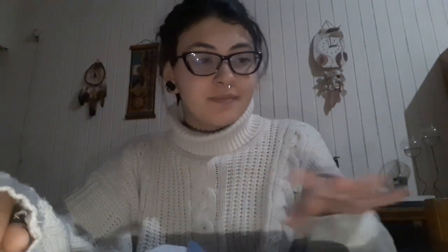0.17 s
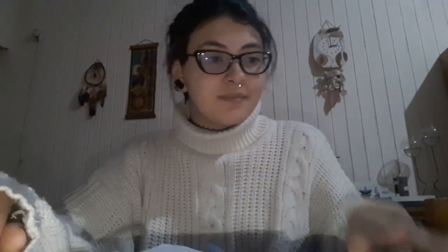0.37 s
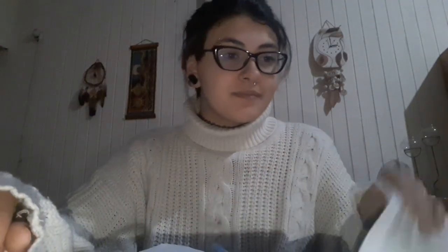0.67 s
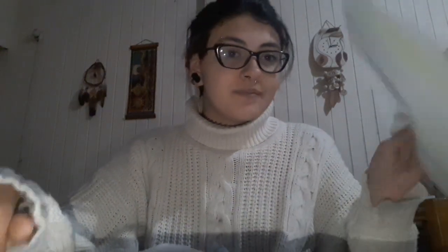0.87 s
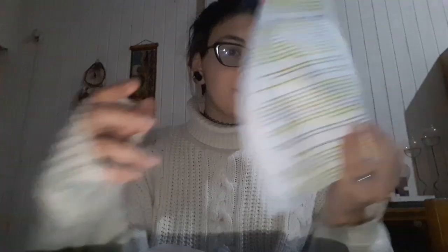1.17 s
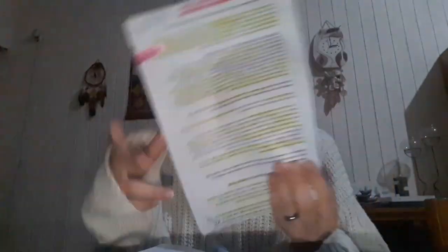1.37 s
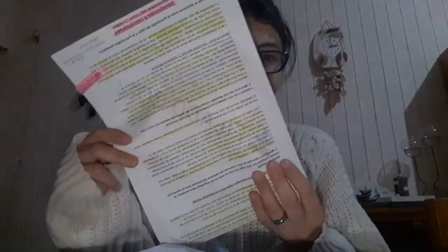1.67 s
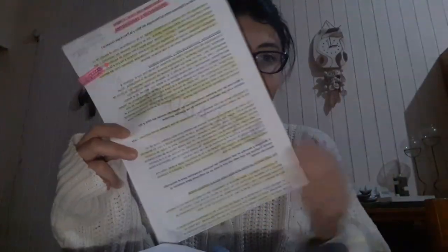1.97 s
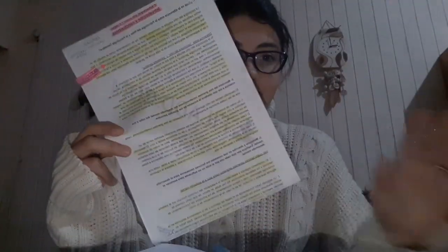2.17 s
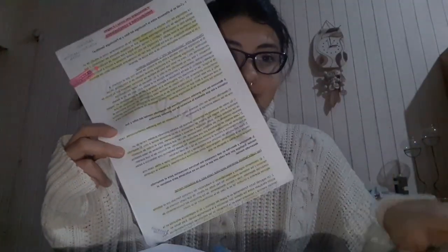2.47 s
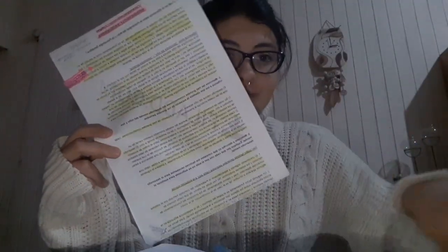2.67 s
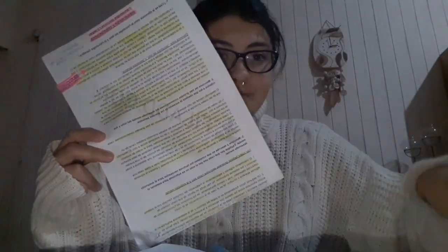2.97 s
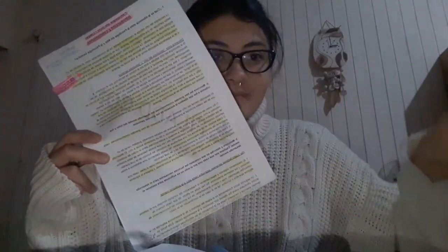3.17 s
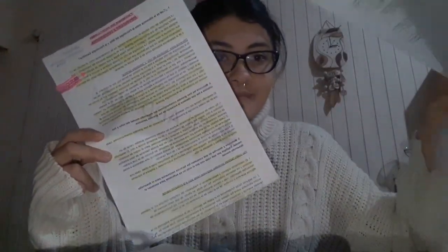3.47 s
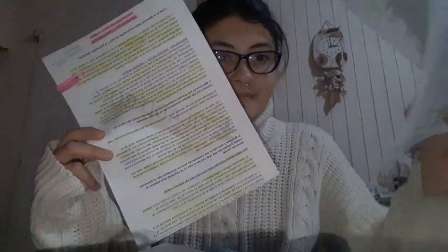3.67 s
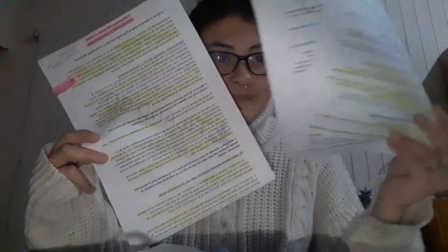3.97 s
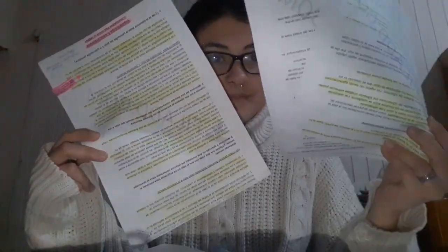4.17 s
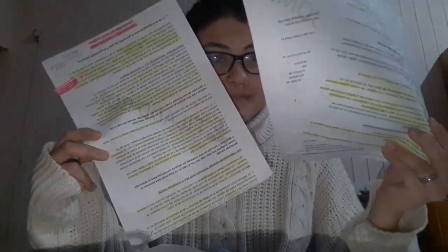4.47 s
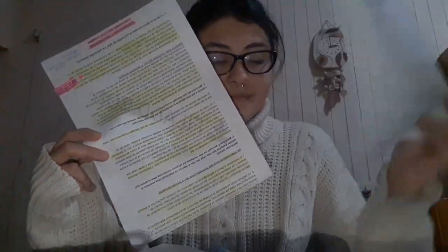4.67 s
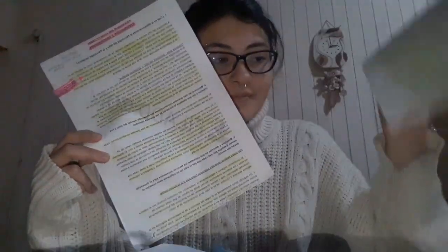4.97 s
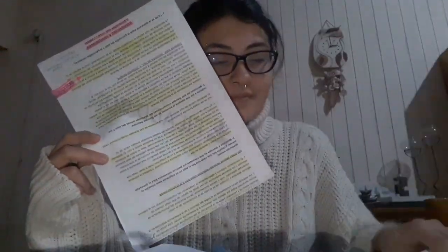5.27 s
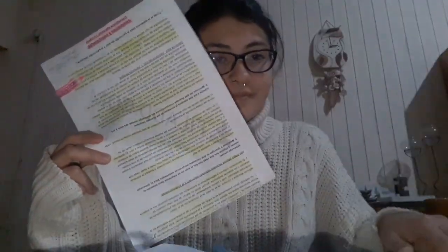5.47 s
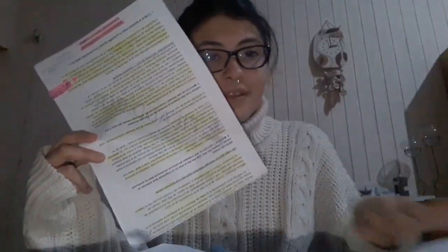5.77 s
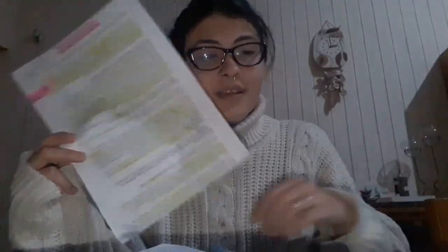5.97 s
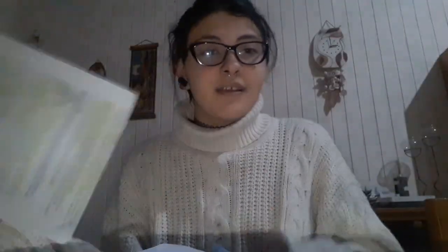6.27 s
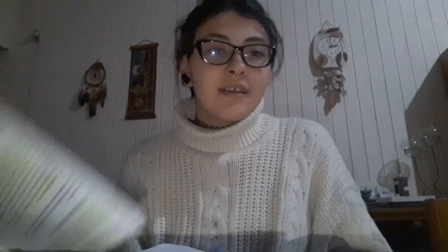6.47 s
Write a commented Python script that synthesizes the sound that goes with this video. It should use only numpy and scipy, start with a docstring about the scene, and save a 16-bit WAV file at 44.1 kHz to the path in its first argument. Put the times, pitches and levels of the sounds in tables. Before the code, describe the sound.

In a quiet room, papers crackle and flap close by, a bright desk knock follows, then a loud papery slap with thumps.

```python
"""A faint rustle over a low room murmur, then sheets picked off a desk, held up and put down again.
Close to a laptop microphone in a small room, sliding strokes rustle and hiss as showers of random slips.
Sheets buckle in sharp snaps, made of short pulse clusters, and flap as they swing, in swells of tiny buckles.
A hand comes down on the desk twice, first with a bright clack, then slapping a sheet; low thumps ring modes."""
import sys
import numpy as np
from scipy import signal
from scipy.fft import rfft, irfft
from scipy.io import wavfile
from scipy.ndimage import uniform_filter1d

SR = 44100
rng = np.random.default_rng(int(sys.argv[2]) if len(sys.argv) > 2 else 0)


def generate_wav(sig):
    """Save sig (samples, or channels by samples) to the path in sys.argv[1] as 16-bit PCM at SR."""
    pcm = np.round(np.clip(np.atleast_2d(sig).T, -1, 1) * 32767).astype(np.int16)
    wavfile.write(sys.argv[1], SR, pcm)


N = 291060  # samples

# Response of the microphone in its case; the treble steps down. Each row: frequency in Hz, gain in dB.
MIC_RESPONSE = [(20, 10.5), (130, 4), (190, 5.5), (265, 5), (325, 0.5), (400, 3.5), (700, -1.5), (1350, -3),
                (2250, -0.5), (3300, -4), (5000, -4.5), (7300, 3), (7900, -13.5), (16000, -15.5)]


def amp(db):
    """Decibels to gain."""
    return 10 ** (np.asarray(db) / 20)


def unit(x):
    """Scales to an rms of one."""
    return x / np.sqrt(np.mean(x ** 2) + 1e-20)


def read(points, hz):
    """Interpolates a table on a log-frequency axis."""
    f, value = np.transpose(points)
    return np.interp(np.log(hz + 1), np.log(f + 1), value)


def add(mix, start_s, sound):
    """Mixes a sound in from start_s, cut at the end of the mix."""
    part = mix[max(round(start_s * SR), 0):][:len(sound)]
    part += sound[:len(part)]


def placed(centre_s, level_db, sound):
    """Start time and scaled sound, centred on centre_s, with its rms level taken over 10 ms."""
    start_s = centre_s - len(sound) / 2 / SR
    return start_s, amp(level_db) * sound / np.linalg.norm(sound) * np.sqrt(SR / 100)


def colour(x, spectrum):
    """Gives a sound a spectrum, as the microphone picks it up."""
    hz = np.fft.rfftfreq(len(x), 1 / SR)
    gain = amp(read(spectrum, hz) + read(MIC_RESPONSE, hz))
    return irfft(rfft(x) * gain, len(x))


def causal(x, gain_of_hz):
    """Minimum-phase filter by a gain curve and the microphone: nothing sounds ahead of its cause."""
    hz = abs(np.fft.fftfreq(len(x), 1 / SR)) + 1
    gain = gain_of_hz(hz) * amp(read(MIC_RESPONSE, hz))
    log_gain = np.log(np.maximum(gain, 1e-4))
    response = np.exp(np.conj(signal.hilbert(log_gain)))
    return np.fft.ifft(np.fft.fft(x) * response).real


def panel(x, centre_hz, q, steep=1.3):
    """A patch of paper radiates a broad band around its centre."""
    def gain(hz):
        detuning = q * (hz / centre_hz - centre_hz / hz)
        return (1 + detuning ** 2 / steep) ** -steep
    return causal(x, gain)


def grains(per_s, spread_db, size):
    """Random slips, as of fibre on fibre, a few much larger than the rest."""
    heights = amp(spread_db * np.minimum(rng.exponential(1, size), 4))
    signs = rng.choice([-1., 1.], size)
    slips = rng.random(size) < per_s / SR
    return unit(heights * signs * slips)


def cluster(decay_s, lead, size=4096):
    """Broadband pulses swell to a break at the middle and die; rise time is lead times decay_s."""
    t = (np.arange(size) - size // 2) / SR
    swell = np.exp(-np.where(t < 0, -t / lead, t) / decay_s)
    z = rfft(rng.standard_normal(size) * swell)
    local_power = uniform_filter1d(abs(z) ** 2, size=70)
    flat = irfft(z / np.sqrt(local_power + 1e-12))
    return flat * np.minimum(1, 20 * swell)


def wander(corner_hz):
    """Slow noise with an rms of one."""
    hz = np.fft.rfftfreq(N, 1 / SR)
    return unit(irfft(rfft(rng.standard_normal(N)) / (1 + (hz / corner_hz) ** 2), N))


def flexed(x, patchy_db):
    """As the sheet bends, its resonances come and go."""
    z = signal.stft(x, nperseg=512)[2]
    patches = uniform_filter1d(rng.standard_normal(z.shape), size=7, axis=0)
    patches = uniform_filter1d(patches, size=4, axis=1)
    gain = amp(patchy_db * unit(patches))
    return unit(signal.istft(z * gain, nperseg=512)[1][:N])


def room_tone():
    """A steady low murmur of air and faint microphone hiss, as shaped noise."""
    # Each row: frequency in Hz, relative density in dB.
    murmur_spectrum = [(20, -20), (50, -8), (100, -2.5), (140, 2), (300, -4.5), (600, -8.5), (1100, -15),
                       (2500, -21.5), (5000, -33), (8000, -40), (14000, -33.5)]
    hz = np.fft.rfftfreq(N, 1 / SR)
    murmur = irfft(rfft(rng.standard_normal(N)) * amp(read(murmur_spectrum, hz)), N)
    return amp(-68.5) * unit(murmur)


def room(x, size=256):
    """Reflections from all sides blur into a diffuse wash; its power dies at its own speed in each band."""
    # Decay of the room. Each row: frequency in Hz, t60 in s.
    room_decay = [(60, 0.39), (160, 0.91), (420, 0.26), (1100, 0.5), (3000, .5), (8000, .5), (15000, 0.52)]
    overlap = size * 3 // 4
    hz, t, z = signal.stft(x, SR, nperseg=size, noverlap=overlap)
    decay = amp(-60 * t[:600] / read(room_decay, hz)[:, None]) ** 2
    decay[:, :3] = 0  # the first reflections take a few milliseconds
    decay = decay / decay.sum(1, keepdims=True)
    power = abs(signal.fftconvolve(abs(z) ** 2, decay, axes=1))[:, :len(t)]
    wash = signal.stft(rng.standard_normal(N), nperseg=size, noverlap=overlap)[2]
    wash = wash * np.sqrt(power / np.mean(abs(wash) ** 2))
    return signal.istft(wash, nperseg=size, noverlap=overlap)[1][:N]


def reflected(x, count=8):
    """The desk, the screen and the nearest walls throw back a few distinct reflections."""
    out = x.copy()
    delays_s = np.geomspace(.0012, .022, count) * rng.uniform(.85, 1.15, count)
    for delay_s in delays_s:
        add(out, delay_s, amp(-21.5) * rng.choice([-1., 1.]) * x)
    return out


def fingers():
    """Very faint, dull random ticks, about fourteen a second, as of fingertips on the held paper."""
    ticks = grains(per_s=14, spread_db=3, size=N)
    return amp(-79) * unit(panel(ticks, centre_hz=480, q=0.51))


def desk():
    """A soft push rings the desk top, a few clear modes over a dense thud; a longer contact is duller."""
    # Low thumps: a faint bass remnant at the start, soft knocks, then two hard blows.
    # Each row: start in seconds, relative level in dB, contact time in s.
    thump_rows = [(.01, -40, 0.015), (0.51, -41.5, 0.0011), (0.774, -42, 0.0021), (1.45, -42.5, 0.0033),
                  (1.565, -43, 0.0018), (2.362, -22.5, 0.00063), (2.376, -29.5, 0.0012),
                  (5.243, -21, 0.0074), (5.307, -21, 0.002), (5.344, -27, 0.0015)]
    # Desk modes. Each row: frequency in Hz, relative level in dB, t60 in s.
    mode_rows = [(58.8, -10, 0.59), (102, -13, 0.088), (138.9, -6.5, 0.27), (205.7, -13.5, 0.44),
                 (268.2, 0, 0.25), (374, -6.5, 0.43), (404, -2, 0.16), (534, -14, 0.18), (650, -13, 0.12),
                 (827, -3, 0.2)]
    pushes, t = np.zeros(N), np.arange(SR) / SR
    ring = np.zeros(SR)
    for hz, db, t60_s in mode_rows:
        ring += amp(db - 60 * t / t60_s) * np.sin(2 * np.pi * (hz * t + rng.random()))
    thud = unit(panel(rng.standard_normal(SR), centre_hz=277, q=0.45))
    thud = amp(-1) * thud * np.exp(-t / 0.048)
    for start_s, db, contact_s in thump_rows:
        u = 2 * np.pi * t / contact_s
        push = u * np.exp(-u)
        add(pushes, start_s, amp(db) * push / push.sum())
    return signal.fftconvolve(pushes, ring + thud)[:N]


def clacks():
    """A small hard thing under the hand strikes and bounces once, bright in a narrow range."""
    # Each row: break time in seconds, level in dB before the mix trim, decay in s.
    clack_rows = [(2.368, -20.5, 0.00092), (2.373, -31, 0.0011)]
    # Each row: frequency in Hz, relative density in dB.
    clack_spectrum = [(500, -10.5), (1500, -10.5), (2100, -11), (2500, 1.5), (3900, 0.5), (4400, -11.5),
                      (5200, -30.5), (15000, -27)]
    out = np.zeros(N)
    for centre_s, db, decay_s in clack_rows:
        sound = causal(cluster(decay_s, lead=0.73), lambda hz: amp(read(clack_spectrum, hz)))
        add(out, *placed(centre_s, db, sound))
    return out


def bursts(rows, lead):
    """Each buckle or slap is a cluster of pulses radiated by a patch of paper."""
    out = np.zeros(N)
    for centre_s, db, hz, q, decay_s in rows:
        add(out, *placed(centre_s, db, panel(cluster(decay_s, lead), hz, q)))
    return out


def slaps():
    """Paper or a palm slaps flat on the desk in a brief broad burst."""
    # Each row: break time in seconds, level in dB before the mix trim, centre in Hz, sharpness Q, decay in s.
    slap_rows = [(2.378, -28.5, 750, 0.47, 0.0034), (2.384, -38, 1048, 0.16, 0.0055),
                 (5.2405, -34.5, 2487, .15, .0012), (5.2445, -25.5, 850, 0.47, 0.0019),
                 (5.2865, -14.5, 1486, 0.44, .003), (5.308, -15, 2520, .17, .002),
                 (5.3135, -22, 1210, 0.36, .002), (5.3215, -22, 2460, 0.25, .003)]
    return bursts(slap_rows, lead=0.67)


def strokes():
    """Each stroke speeds up and slows down; gives rustle and hiss gains, hiss following speed more steeply."""
    # Sliding strokes: sheets, a sleeve or a hand rub over paper or desk. Each row: start, fastest moment
    # and end in seconds, rustle and hiss peak levels in dB before the later gains.
    stroke_rows = [(0, 0.047, 0.093, -69.5, -68), (0.093, 0.254, 0.44, -76.5, -82),
                   (0.493, 0.635, 0.85, -52, -47), (0.681, .76, 0.92, -41, -38.5),
                   (.9, 0.962, 1.21, -52.5, -57), (1.261, 1.507, 2.8, -67, -75),
                   (1.552, 1.66, 1.736, -43.5, -47.5), (1.923, 1.976, 1.975, -55, -58),
                   (2.358, 2.433, 2.5, -54, -44), (2.61, 2.658, 2.824, -66.5, -51.5),
                   (2.752, 2.841, 2.99, -58.5, -48.5), (3.0, 3.195, 3.22, -59, -53),
                   (3.19, 3.265, 3.44, -49.5, -39.5), (3.47, 3.513, 3.67, -59.5, -54.5),
                   (4.668, 4.76, 4.83, -72, -86), (4.836, 4.835, 5.13, -57.5, -58.5),
                   (5.27, 5.32, 5.46, -40, -38), (5.61, 5.64, 5.88, -64, -62),
                   (6.19, 6.405, 6.68, -68.5, -74)]
    rustle_swell_db, hiss_swell_db = 9, 13  # from either end to the fastest moment
    grab_s, release_s = 0.0052, .03  # the surfaces meet and part
    t, coarse, fine = np.arange(N) / SR, np.zeros(N), np.zeros(N)
    for start, fastest, end, rustle_db, hiss_db in stroke_rows:
        slowness = np.interp(t, [start, fastest, end], [1, 0, 1])
        contact = np.interp(t, [start, start + grab_s, end, end + release_s], [0, 1, 1, 0])
        coarse = np.hypot(coarse, contact * amp(rustle_db - rustle_swell_db * slowness))
        fine = np.hypot(fine, contact * amp(hiss_db - hiss_swell_db * slowness))
    return coarse, fine


def sliding():
    """Sheets, a sleeve or a hand rub: coarse slips rustle, fine ones hiss, and small creases crackle."""
    # Each row of both: frequency in Hz, relative density in dB.
    rustle_spectrum = [(40, -20.5), (130, 1.5), (300, -4), (900, 7), (2200, -2), (3500, -10), (6000, -20),
                       (15000, -45.5)]
    hiss_spectrum = [(300, -29), (1500, -9.5), (3000, -5.5), (5000, -5.5), (7000, -4.5), (10000, -2),
                     (15500, -3)]
    coarse, fine = strokes()
    grip = wander(corner_hz=27)  # the contact tightens and loosens
    rustle = colour(grains(per_s=3100, spread_db=2.0, size=N), rustle_spectrum)
    rustle = flexed(rustle, patchy_db=5) * amp(5.0 + 0.73 * grip)
    hiss = colour(grains(per_s=10000, spread_db=1.5, size=N), hiss_spectrum)
    hiss = flexed(hiss, patchy_db=1.5) * amp(0.16 + 1.2 * grip)
    creases = grains(per_s=160, spread_db=3, size=N)
    crackle = amp(-2) * flexed(panel(creases, centre_hz=2000, q=.8), patchy_db=3)
    return coarse * (rustle + crackle) + fine * hiss


def crinkles():
    """During strokes paper buckles at random in patches of several sizes, harder as the stroke speeds up."""
    # Centre frequency of each patch, in Hz.
    patch_centres_hz = [650, 1210, 2300]
    patches = np.zeros(N)
    for hz in patch_centres_hz:
        patches += panel(grains(per_s=12, spread_db=1.5, size=N), hz, q=1.0)
    coarse, _ = strokes()
    return amp(-4) * coarse * unit(patches)


def flaps(size=32768):
    """A swinging, fluttering or brushed sheet sheds a shower of tiny buckles."""
    # Each row: peak time in seconds, level in dB before the swell and mix trim, centre in Hz, rise in s.
    flap_rows = [(0.519, -43.5, 533, 0.013), (.655, -42, 333, 0.012), (1.125, -49, 920, 0.01),
                 (1.463, -42, 749, 0.011), (1.566, -34.5, 1098, .003), (1.635, -36, 1110, 0.031),
                 (1.745, -43, 594, 0.042), (2.026, -43, 1014, 0.012), (2.885, -49, 298, 0.023),
                 (3.159, -49, 1810, 0.026), (3.266, -52, 573, 0.019), (3.346, -46, 530, 0.0093),
                 (3.422, -47.5, 660, 0.007), (3.825, -53.5, 1127, 0.0018), (4.94, -48, 600, 0.015),
                 (5.02, -50.5, 720, .025), (5.251, -30, 1000, 0.0056), (5.311, -26.5, 1990, 0.03),
                 (5.347, -24, 1068, 0.014), (6.363, -39, 1504, 0.0055), (6.384, -40, 618, 0.022)]
    fall_s, q = .027, .45  # shared by all flaps
    out, t = np.zeros(N), (np.arange(size) - size // 4) / SR
    for peak_s, db, hz, rise_s in flap_rows:
        buckles = grains(per_s=1600, spread_db=3, size=size)
        swell = np.exp(-np.where(t < 0, (t / rise_s) ** 2 / 2, t / fall_s))
        add(out, peak_s + t[0], amp(db) * unit(panel(buckles, hz, q, steep=5.0)) * swell)
    return out


def snaps():
    """A sheet buckles: a patch pops over and radiates a sharp burst."""
    # Each row: break time in seconds, level in dB before the mix trim, centre in Hz, sharpness Q, decay in s.
    snap_rows = [(.3205, -72, 2600, 0.64, 0.00044), (.512, -38, 940, 0.24, 0.0016),
                 (.5981, -42, 1330, 0.091, 0.0012), (.6401, -44.5, 2060, 0.76, 0.0011),
                 (.7041, -38, 1130, 1.2, .0007), (.7267, -34, 1785, 0.31, 0.00049),
                 (.7443, -34.5, 2030, 0.14, 0.00077), (.7759, -30.5, 900, 0.031, 0.0006),
                 (.7916, -28.5, 3680, 0.91, 0.00038), (.8387, -17, 1860, 0.59, 0.0033),
                 (.8529, -29.5, 863, .57, 0.0047), (.8716, -24.5, 2850, 0.31, 0.00026),
                 (.9669, -39, 1030, 0.53, 0.0048), (1.0175, -38.5, 1540, 0.35, 0.0014),
                 (1.1121, -36.5, 1130, .3, 0.0015), (1.4761, -43.5, 610, 0.42, 0.002),
                 (1.5756, -26.5, 902, 0.26, 0.0014), (1.6327, -21, 1100, 0.39, 0.0011),
                 (1.6578, -22.5, 1650, 0.56, 0.0002), (1.7005, -30, 730, 0.5, 0.0026),
                 (1.7244, -36, 950, 0.48, 0.00086), (1.7597, -34.5, 620, 0.32, 0.0069),
                 (1.8324, -44.5, 730, 0.72, 0.0011), (1.9064, -54.5, 800, 0.4, 0.00031),
                 (2.0225, -36.5, 890, 0.67, 0.0039), (2.0592, -41.5, 910, 1, 0.0039),
                 (2.892, -36.5, 6030, 0.46, 0.00046), (2.9059, -33.5, 4460, 0.41, 0.00009),
                 (2.9179, -24, 4400, 0.39, 0.0027), (2.921, -30, 2160, 4.2, 0.00097),
                 (3.0183, -40.5, 1730, .14, 0.0015), (3.3249, -41.5, 1455, 0.15, .0014),
                 (3.4143, -39.5, 1470, 0.34, 0.00097), (3.5827, -44, 2500, 0.34, 0.00077),
                 (3.819, -55.5, 1385, 0.59, 0.00072), (3.859, -53, 910, 1.135, 0.00096),
                 (4.1217, -59.5, 250, 0.93, 0.0026), (4.5887, -59, 492, 0.8, .001),
                 (4.7559, -54, 848, 0.95, 0.0012), (4.8958, -44.5, 483, 0.32, 0.0004),
                 (4.9287, -37, 770, 1.5, 0.0026), (5.9238, -55.5, 456, 0.28, 0.0012),
                 (5.9607, -62.5, 1690, 0.95, 0.001), (6.2109, -56.5, 914, 0.68, 0.0014),
                 (6.3584, -44, 1200, 0.52, 0.0021), (6.4975, -51.5, 4550, 1.2, 0.0007)]
    return bursts(snap_rows, lead=0.93)


def scene():
    """Snaps are nearly dry; slaps, clacks and moving paper stir more room; the thump mostly rings by itself."""
    thump = amp(-2.0) * desk()
    clack = amp(-1.5) * clacks()
    slap = amp(-0.53) * slaps()
    moving = amp(-0.63) * flaps() + amp(-3.0) * sliding()
    held = amp(-1.1) * snaps() + fingers() + crinkles()
    direct = held + moving + slap + clack + thump
    room_send = amp(-16) * held + amp(-8.5) * moving
    room_send += amp(-4.0) * slap + amp(-4.5) * clack + amp(-14) * thump
    return (reflected(direct + room(room_send)) + room_tone())[None]


def record(dry):
    """The microphone loses the deepest bass; then the band limit."""
    bass_cut_hz, edge_hz = 54, 16000
    bass_cut = signal.butter(3, bass_cut_hz, "high", fs=SR, output="sos")
    heard = signal.sosfilt(bass_cut, dry)
    band_limit = signal.firwin(401, edge_hz, window=("kaiser", 9), fs=SR)
    return signal.oaconvolve(heard, band_limit[None], "same")


dry = scene()
out = record(dry)
generate_wav(out)
```